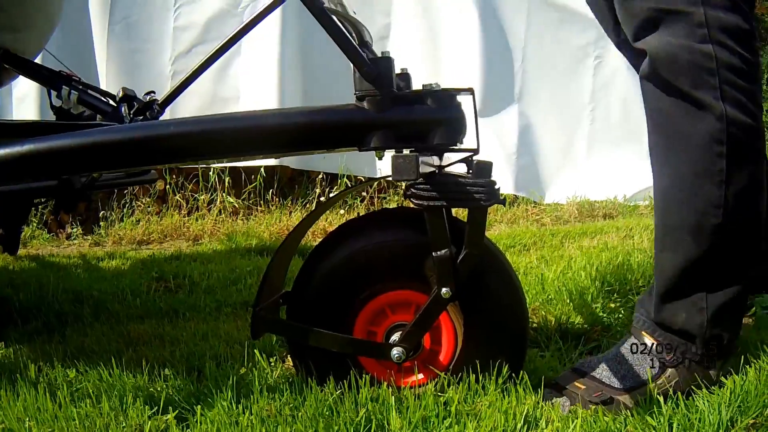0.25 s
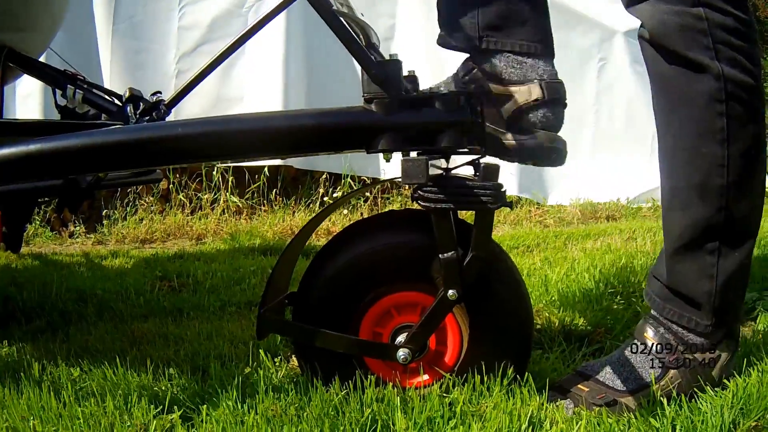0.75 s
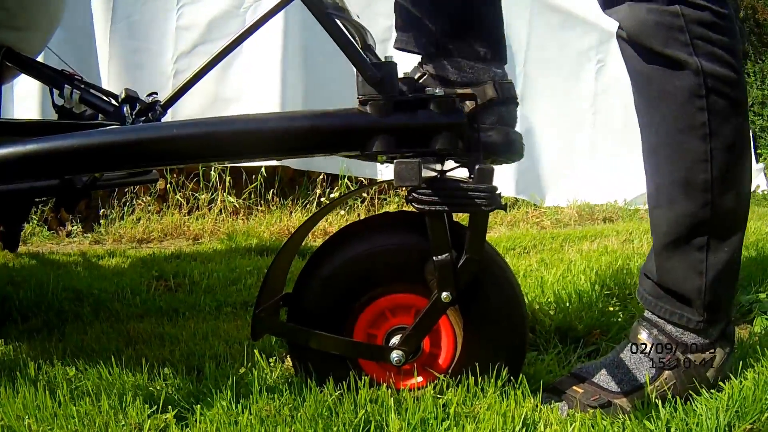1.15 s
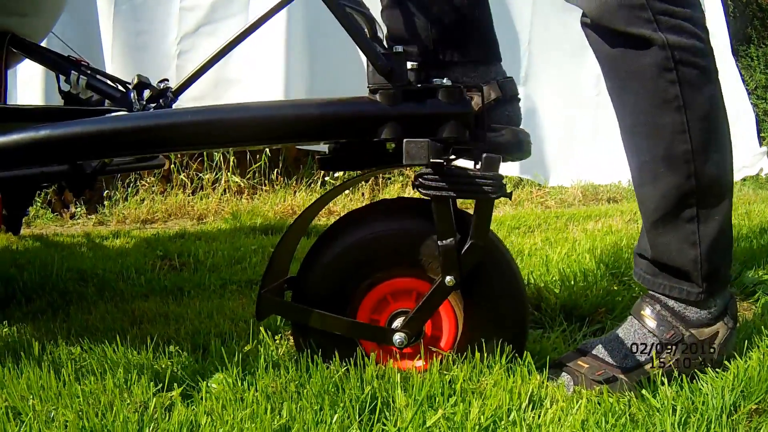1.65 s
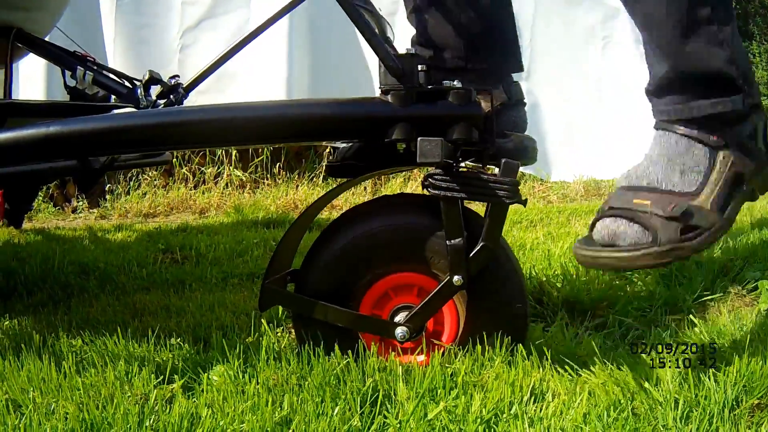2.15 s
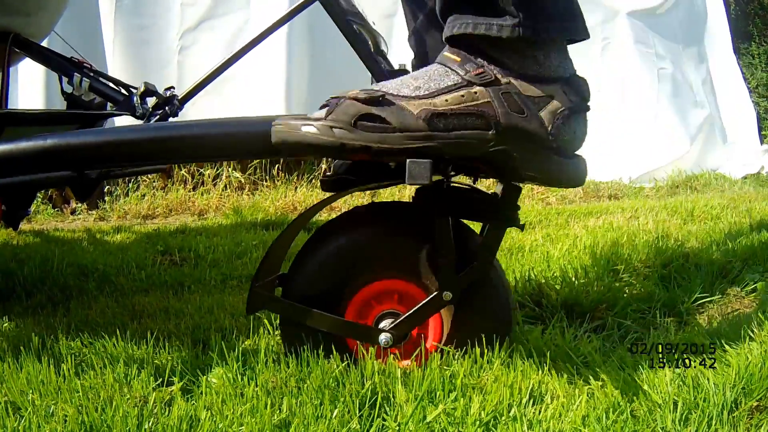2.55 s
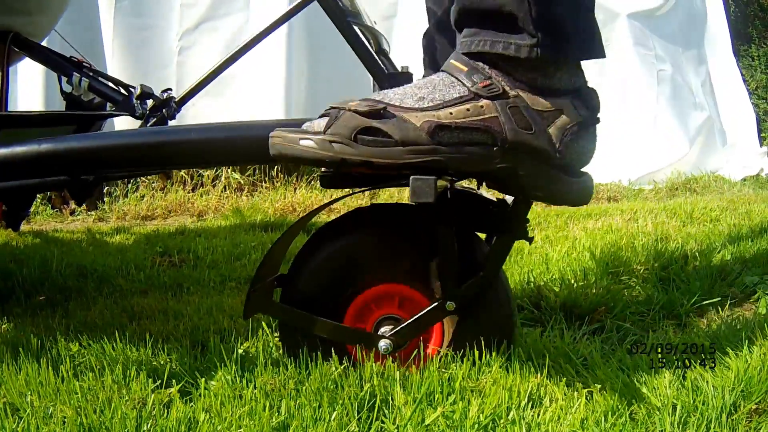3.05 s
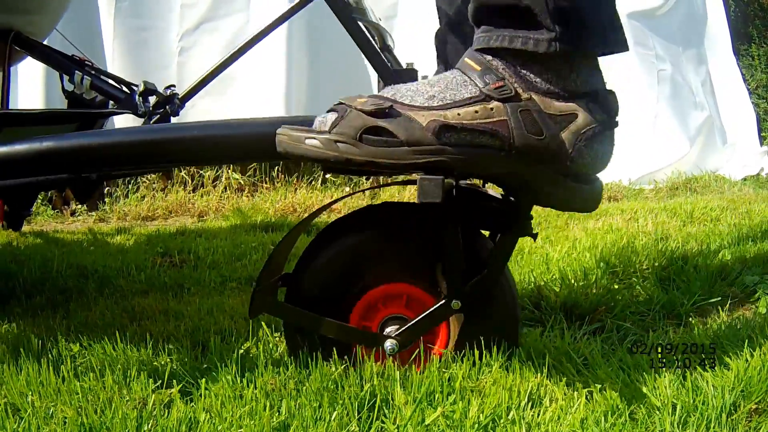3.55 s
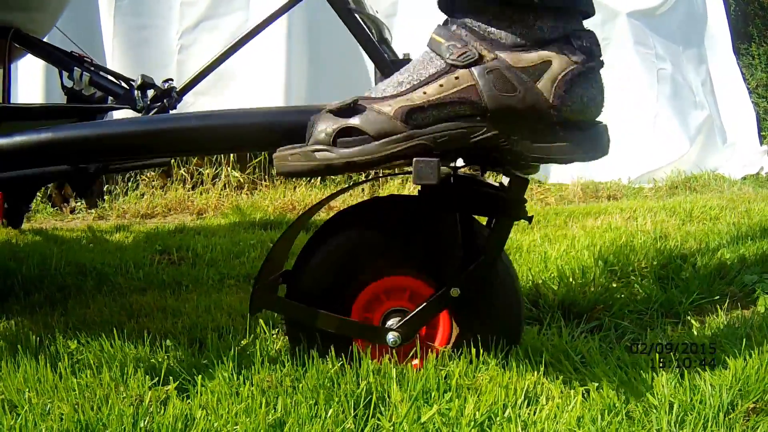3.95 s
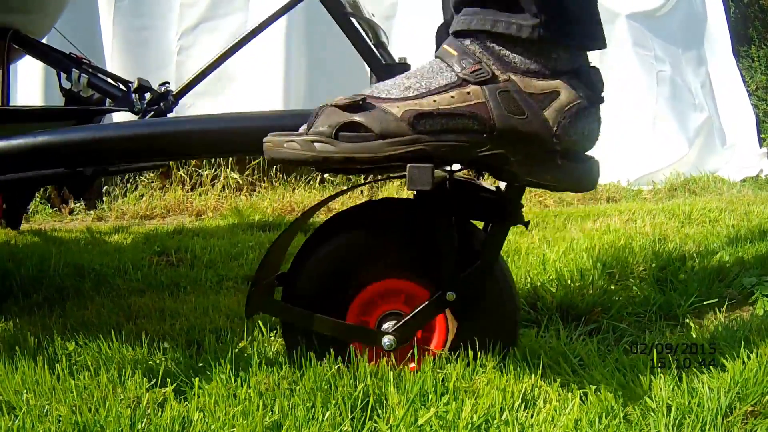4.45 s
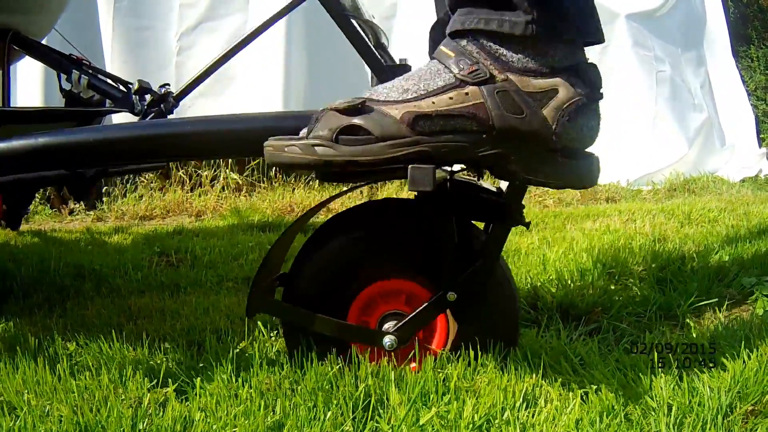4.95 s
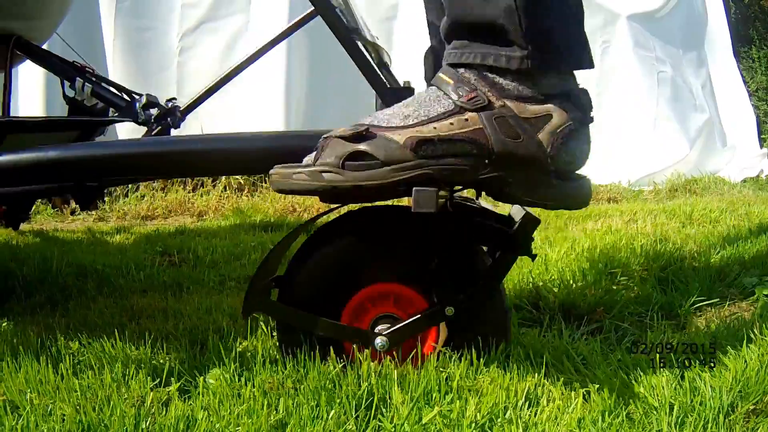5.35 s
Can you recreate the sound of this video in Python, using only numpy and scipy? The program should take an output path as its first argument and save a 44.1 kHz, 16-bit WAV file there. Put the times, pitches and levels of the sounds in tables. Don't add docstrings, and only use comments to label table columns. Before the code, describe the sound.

A foot-pumped sprung wheel fork gives sharp metallic clicks and short squeaks over a quiet low outdoor rumble with faint aircraft drone.

```python
import sys
import numpy as np
from scipy import signal
from scipy.fft import rfft, irfft, next_fast_len
from scipy.io import wavfile
from scipy.ndimage import uniform_filter1d, map_coordinates

SR = 44100
rng = np.random.default_rng(int(sys.argv[2]) if len(sys.argv) > 2 else 0)


def transcribe(u):
    v = np.clip(np.atleast_2d(u).T, -1, 1)
    q = np.round(v * 32767).astype(np.int16)
    wavfile.write(sys.argv[1], SR, q)


def natural_amplitude(level_db):
    exponent = np.asarray(level_db, float) / 20
    return 10 ** exponent


N = 246078


def unit(x):
    return x / np.sqrt(np.mean(x ** 2) + 1e-20)


def along(points, hz):
    f, v = np.transpose(points)
    return np.interp(np.log(hz + 1), np.log(f + 1), v)


def curves(rows):
    s, *cols = np.transpose(rows)
    return [np.interp(np.arange(N) / SR, s, c) for c in cols]


def bell(t, middle, half):
    return np.exp(-((t - middle) / half) ** 2)


def bumps(rows, base_db):
    t = np.arange(N) / SR
    return natural_amplitude(base_db) + sum(natural_amplitude(db) * bell(t, s, half) for s, db, half in rows)


def wobble(rate):
    return map_coordinates(rng.standard_normal(int(N * rate / SR) + 4), [np.arange(N) * rate / SR])


def filtered(x, response):
    m = next_fast_len(x.shape[-1] + 8192)
    return irfft(rfft(x, m) * response(np.fft.rfftfreq(m, 1 / SR)), m)[..., :x.shape[-1]]


def causal(spectrum):
    cep = irfft(np.log(natural_amplitude(along(spectrum, np.fft.rfftfreq(2048, 1 / SR))) + 1e-4))
    cep = cep * np.r_[1, np.full(1023, 2), 1, np.zeros(1023)]
    h = irfft(np.exp(rfft(cep)))[:1024]
    return h / np.linalg.norm(h)


def noise(spectrum, patchy_db):
    z = signal.stft(rng.standard_normal(N), nperseg=512)[2]
    field = uniform_filter1d(uniform_filter1d(rng.standard_normal(z.shape), 8, 0), 6, 1)
    x = signal.istft(z * natural_amplitude(patchy_db * unit(field)), nperseg=512)[1][:N]
    return unit(filtered(x, lambda hz: natural_amplitude(along(spectrum, hz))))


def dying_tones(rows):
    out, t = np.zeros(N + SR), np.arange(SR // 5) / SR
    for s, db, hz, t60 in rows:
        out[round(s * SR):][:len(t)] += natural_amplitude(db - 60 * t / t60) * np.sin(2 * np.pi * hz * t)
    return out[:N]


# (frequency [Hz], level [dB])
HISS_COLOUR = [(120, -73), (200, -2), (308, -9.5), (475, -7.5), (579, -13), (1090, -11.5), (13500, -19.5),
               (14800, -19.5)]


def hiss():
    return natural_amplitude(-67) * np.array([noise(HISS_COLOUR, patchy_db=.5), noise(HISS_COLOUR, patchy_db=1.5)])


# (time [s], level [dB])
TRAFFIC_LEVEL = [(0, -71), (.15, -62.5), (.76, -62.5), (1.15, -65.5), (1.35, -62.5), (2.1, -58), (2.5, -59),
                 (2.9, -63.5), (3.4, -62.5), (4.5, -59), (4.8, -61.5), (4.95, -57.5), (5.1, -62.5),
                 (5.5, -60.5)]
# (frequency [Hz], level [dB])
TRAFFIC_COLOUR = [(24, -24), (40, 0.5), (97, 1.5), (113, 0), (193, -4), (248, -9), (284, -16), (600, -28.5),
                  (780, -30), (1320, -120)]


def traffic():
    return natural_amplitude(curves(TRAFFIC_LEVEL)[0]) * noise(TRAFFIC_COLOUR, patchy_db=1.5)


# (frequency [Hz], level [dB])
MOTOR_TONES = [(124.8, -65), (191, -74), (146.7, -72)]


def motors():
    t = np.arange(N) / SR
    return sum(natural_amplitude(db + 3.5 * wobble(3.85)) * np.sin(2 * np.pi * hz * t + wobble(2.903))
               for hz, db in MOTOR_TONES)


BLADE_HZ, SPEED_MS, NEAREST_M, NEAREST_S = 76.25, 106.7, 293, 2.89
BLADE_FLOOR = [-68, -73.5, -87]
# (middle [s], level [dB], half length [s])
BLADE_SWELLS = [
    [(.55, -71, .3), (1.63, -55.5, 0.34), (2.75, -66.5, 0.46), (4, -58.5, 0.49), (4.75, -68, 0.35)],
    [(1.05, -81, .3), (2.15, -66.5, 0.49), (4.3, -63.5, 0.48), (5.4, -68.5, 0.41)],
    [(2.55, -63, 0.13), (3.6, -67.5, 0.64), (4.6, -69, 0.64), (5.45, -61.5, 0.24)],
]


def aircraft():
    past_m = SPEED_MS * (np.arange(N) / SR - NEAREST_S)
    receding_ms = SPEED_MS * past_m / np.hypot(past_m, NEAREST_M)
    hz = BLADE_HZ / (1 + receding_ms / 343)
    turn = 2 * np.pi * np.cumsum(hz) / SR
    out = np.zeros(N)
    for k, db in enumerate(BLADE_FLOOR):
        level = bumps(BLADE_SWELLS[k], db) * natural_amplitude(0.5 + 1.05 * wobble(3.9))
        out += level * np.sin((k + 1) * turn + .5 * wobble(4.07))
    return out


# (middle [s], level [dB], half length [s])
GUST_SWELLS = [(0, -63, 0.051), (.6, -68, 0.48), (1.23, -66, 0.037), (1.34, -65, 0.038), (1.6, -66, 0.13),
               (2.16, -66, 0.077), (2.7, -70, 0.21), (3.1, -64, 0.21), (3.46, -64, 0.052),
               (3.63, -72, 0.081), (4.28, -60, 0.083), (4.53, -46.5, 0.07), (4.68, -54, 0.063),
               (4.85, -46.5, 0.069), (5.1, -65, 0.053), (5.3, -56.5, 0.11)]
# (frequency [Hz], level [dB])
GUST_COLOUR = [(8.8, -13), (15, 2.5), (19, -4), (22, -8), (120, -15.5), (160, -54), (260, -120)]


def wind():
    shared = noise(GUST_COLOUR, patchy_db=2.5)
    own = np.array([noise(GUST_COLOUR, patchy_db=3), noise(GUST_COLOUR, patchy_db=2.5)])
    lumps = natural_amplitude(2.5 * wobble(12))
    return bumps(GUST_SWELLS, base_db=-70) * natural_amplitude([[-3], [2]]) * unit(lumps * (shared + 0.48 * own))


# (time [s], level [dB])
GRASS_LEVEL = [(0, -72), (.4, -68), (2.2, -67.5), (3, -69.5), (3.7, -67.5), (4.5, -72), (5.58, -70)]
# (frequency [Hz], level [dB])
GRASS_COLOUR = [(150, -34), (250, -2.5), (471, -6.5), (652, -5), (1090, -2.5), (1760, -3.5), (2570, -4.5),
                (3100, -6.5), (5460, -6.5), (7300, -18.5), (13500, -41), (15000, -34)]


def grass():
    return natural_amplitude(curves(GRASS_LEVEL)[0] + 0.5) * noise(GRASS_COLOUR, patchy_db=1.0)


# (time [s], level [dB])
CREEP_LEVEL = [(0, -61.5), (.28, -67.5), (.59, -62), (.96, -67.5), (1.24, -70), (1.48, -62.5),
               (1.75, -71.5), (2, -69), (2.24, -64.5), (3.09, -72), (3.55, -65), (4.51, -67), (5.58, -68.5)]
# (frequency [Hz], level [dB])
CREEP_COLOUR = [(2500, -18), (3800, -11), (4600, -7.5), (5300, -2.5), (6300, -6), (7500, -17.5),
                (10000, -24)]


def creep():
    (level_db,) = curves(CREEP_LEVEL)
    return natural_amplitude(level_db - 3.5 + 2.5 * wobble(24.8)) * noise(CREEP_COLOUR, patchy_db=-1.0)


# (middle [s], level [dB], half length [s], dull part [dB])
BRUSHES = [(0.006, -70, 0.03, 0), (0.593, -68.5, 0.22, -23), (2.173, -60.5, 0.046, -3),
           (2.34, -62.5, 0.062, -18), (2.765, -66.5, 0.091, -13), (2.94, -67, 0.027, 1),
           (3.255, -61.5, 0.042, -19), (3.56, -64.5, 0.029, 1.5), (3.764, -49.5, 0.015, -33),
           (4.307, -64, 0.034, -17), (4.59, -69, 0.02, -4), (4.796, -60.5, 0.042, -13),
           (5.088, -69, 0.03, -14), (5.29, -60.5, 0.036, -24), (5.351, -68, 0.026, -2)]
# (frequency [Hz], level [dB])
BRIGHT_COLOUR = [(1470, -40), (2500, -12), (4050, -3), (4480, -5), (5250, 4), (7980, -11.5), (9620, -16),
                 (14000, -28)]
# (frequency [Hz], level [dB])
DULL_COLOUR = [(600, -40), (1000, -7), (2000, -4), (4000, -6), (5500, -17), (8000, -39), (12000, -120)]


def brushing():
    t = np.arange(0, N / SR + .002, .002)
    swells = sum(natural_amplitude([[db], [db + dull_db]]) * bell(t, s, half) for s, db, half, dull_db in BRUSHES)
    bright, dull = curves(np.vstack([t, swells]).T)
    grit = np.exp(0.22 * wobble(400)) * natural_amplitude(1.5 * wobble(55))
    return grit * (bright * noise(BRIGHT_COLOUR, patchy_db=0.5) + dull * noise(DULL_COLOUR, patchy_db=3))


# (time [s], level [dB], frequency [Hz], negative starts inward, t60 [s])
THUMPS = [
    (.6802, -39.5, -300, .04),
    (.6938, -43, -178, .07),
    (1.506, -56, 350, .06),
    (2.543, -54, 400, .04),
    (4.253, -58, 450, .03),
    (4.931, -57, 420, .025),
    (4.937, -56, 260, .04),
    (4.8395, -43, 70, .07),
    (4.8785, -44, -110, .04),
]


def thuds():
    return dying_tones(THUMPS)


# (time [s], level [dB], frequency [Hz], t60 [s])
FORK_PINGS = [(1.4845, -48, 7000, .02), (1.489, -58, 2300, .05), (1.507, -29, 7000, .025),
              (1.507, -26, 5500, .016), (1.512, -40, 5850, .05), (1.5205, -43, 5800, .03),
              (.6825, -36, 4877, .03), (.691, -47, 5800, .08), (.6815, -41, 6476, .02),
              (2.5533, -52, 4550, .02), (2.5605, -46, 5500, .012), (2.648, -56, 6300, .025),
              (2.651, -57, 4500, .06), (2.652, -59, 2250, .03), (3.1592, -50, 1200, .025),
              (3.161, -49, 4950, .03), (3.166, -53, 5950, .16), (3.166, -56, 5860, .07),
              (3.5075, -46, 4900, .025), (3.508, -51, 7000, .02), (3.509, -49, 6000, .04),
              (3.5475, -52, 5430, .03), (3.766, -38, 5000, .04), (3.763, -51, 1100, .03),
              (3.786, -56, 3400, .05), (4.9295, -54, 2200, .015), (5.4238, -34, 5900, .03),
              (5.424, -42, 3693, .025), (5.43, -53, 3500, .12)]


def pings():
    return dying_tones(FORK_PINGS)


# (time [s], slip rate [Hz], level [dB])
LONG_SQUEAKS = [
    [(2.092, 855, -67), (2.103, 945, -57), (2.113, 1160, -55.5), (2.121, 1220, -55), (2.129, 1295, -52),
     (2.139, 1300, -61)],
    [(3.546, 1600, -62), (3.549, 1300, -58), (3.554, 1060, -58), (3.564, 1300, -63)],
    [(4.0405, 1225, -49), (4.049, 1250, -49), (4.0555, 1140, -50), (4.058, 1160, -43), (4.063, 1200, -41.5),
     (4.07, 1129, -43), (4.079, 830, -47)],
]
# (roughness [0-1], lowest tone [dB], second tone [dB])
SQUEAK_VOICES = [(.03, 2, 2), (.03, 11, -8), (.06, -5, -8)]
# (time [s], length [s], first rate [Hz], last rate [Hz], level [dB])
COIL_CHIRPS = [
    (2.553, .011, 4400, 2750, -59),
    (2.553, .012, 4500, 4900, -59),
    (2.645, .017, 1200, 1110, -77),
    (3.7145, .016, 2450, 3470, -55.5),
    (3.729, .009, 3950, 4300, -60),
    (3.737, .01, 4200, 3900, -65),
    (3.741, .012, 3000, 3400, -68),
    (4.471, .011, 1000, 1000, -68),
]
CHIRP_VOICE = (.05, 19, 1)
CHIRP_SWELL_DB, CHIRP_PEAK, CHIRP_BEND = 10, .7, .9
EASY_HZ, ROUGH_PER_OCT, LOW_DB_PER_OCT = 1200, .2, 45


def slips():
    runs = [(rows, voice, 1) for rows, voice in zip(LONG_SQUEAKS, SQUEAK_VOICES)]
    for s, length, first, last, db in COIL_CHIRPS:
        start = (s, first, db - CHIRP_SWELL_DB)
        peak = (s + length * CHIRP_PEAK, first + (last - first) * CHIRP_BEND, db)
        end = (s + length, last, db - CHIRP_SWELL_DB)
        runs.append(([start, peak, end], CHIRP_VOICE, 0))
    for rows, (rough, low_db, second_db), sticks in runs:
        s, *cols = np.transpose(rows)
        t = np.arange(s[0], s[-1], 1 / SR)
        hz, db = (np.interp(t, s, c) for c in cols)
        slow = sticks * np.clip(np.log2(EASY_HZ / hz), -.3, .2)
        roughness = np.abs(rough) + ROUGH_PER_OCT * np.maximum(slow, 0)
        yield s, t, hz, db, roughness, low_db + LOW_DB_PER_OCT * slow, second_db


# (frequency [Hz], level [dB])
SQUEAK_COLOUR = [(590, -36), (1000, -21), (1220, -10), (1470, 8), (2340, -7.5), (2820, -13), (3480, -5),
                 (4060, -1.5), (5660, 5.5), (7220, -8), (14000, -22)]


def squeaks():
    out = np.zeros(N)
    for s, t, hz, db, rough, low_db, second_db in slips():
        draw = rng.standard_normal((15, len(t)))
        jitter = unit(uniform_filter1d(draw[0], 30))
        turn = 2 * np.pi * np.cumsum(hz * (1 + 0.39 * (rough + 0.065) * jitter)) / SR
        k = np.arange(1, 13)[:, None]
        flicker = natural_amplitude(2 * unit(uniform_filter1d(draw[3:], 250)) + second_db * (k == 2))
        bright_db = 1.6 * (db - db.max()) * np.clip(np.log2(k * hz / 6500), 0, 1)
        colour = natural_amplitude(along(SQUEAK_COLOUR, k * hz) + bright_db)
        tones = flicker * colour * np.cos(k * turn + np.pi / 2 + .5 * draw[3:, :1])
        grit = signal.fftconvolve(draw[1] * (1 + np.cos(turn)) ** 2, causal(RATTLE_COLOUR))[:len(t)]
        share = np.clip(rough, 0, 1)
        size = natural_amplitude(1.5 * unit(uniform_filter1d(draw[2], 40)))
        low_turn = 2 * np.pi * np.cumsum(hz * (1 + 0.008 * jitter)) / SR
        voice = np.sqrt(1 - share) * size * unit(tones.sum(0)) + np.sqrt(share) * unit(grit)
        voice = voice + natural_amplitude(low_db - 9.0) * np.cos(low_turn)
        edge = np.clip(np.minimum(t - s[0], s[-1] - t) / 0.00032, 0, 1)
        out[round(s[0] * SR):][:len(t)] += natural_amplitude(db) * edge * voice
    t = np.arange(SR // 8) / SR
    after = rng.standard_normal(len(t)) * natural_amplitude(-60 * t / 0.091)
    return out + natural_amplitude(-9.5) * signal.fftconvolve(out, after / np.linalg.norm(after))[:N]


# (time [s], peak level [dB], low knock [dB], loudest ring [Hz], its level [dB])
PIVOT_SNAPS = [(.678, -37, -12, 5860, -14), (.6804, -28, -41, 5380, -15), (.6849, -37, -14, 4800, -16),
               (1.4828, -38.5, -12, 5230, -21), (1.4991, -35, -35, 4570, -8), (1.506, -23, -47, 5360, -14),
               (1.5071, -26, -27, 5200, -11), (1.9076, -43.5, -34, 5000, -8),
               (2.0442, -34.5, -24, 5800, -11), (2.0744, -23, -19, 5220, -6),
               (3.1592, -36.5, -6.5, 5720, -9), (3.5047, -32, -22, 5350, -19),
               (3.695, -33.5, -16, 5920, -6), (3.7598, -24.5, -23, 5060, -19), (3.776, -33, -11, 5960, -16),
               (4.0512, -46, -23, 4900, -17), (5.4231, -22.5, -23, 5770, -30)]
# (time [s], peak level [dB], low knock [dB])
PIVOT_TICKS = [(0.698, -45, -4), (1.473, -50, -16), (1.52, -43, -2), (1.5838, -49.5, -7), (2.531, -47, -13),
               (2.5417, -44, -15), (2.5563, -47, -29), (2.6445, -48, -24), (2.9264, -47, -17),
               (2.9914, -47, -35), (3.039, -51, -25), (3.057, -52, -24), (3.448, -48.5, -22),
               (3.549, -51, -22), (4.2516, -50, -0.5), (4.331, -53.5, 3.5), (4.4836, -42.5, -10),
               (4.674, -56, -26), (4.817, -50, 2.5), (4.931, -49.5, 4), (5.0038, -50.5, -0.5),
               (5.2799, -43.5, -29), (5.319, -50, 2), (5.4994, -51, 0.5)]
# (frequency [Hz], level [dB], t60 [s])
STEEL_MODES = [(1040, -29, 0.076), (1760, -31, 0.027), (2163, -11, 0.068), (2530, -7, 0.16),
               (2780, -7, 0.087), (3550, -23, 0.082), (3960, -15, .05), (4340, -5, 0.069), (4980, -2, 0.06),
               (5250, 3.5, 0.064), (5570, -5.5, 0.036), (5770, 2.5, 0.059), (6540, 0, 0.042),
               (7010, 2.5, 0.031), (8160, -1, 0.034)]
# (frequency [Hz], level [dB])
RATTLE_COLOUR = [(350, -56), (600, -65), (1440, -15.5), (1730, -5), (1900, -20.5), (2090, -11.5),
                 (4330, -4), (5780, -2), (7720, -12), (13200, -29), (16000, -45)]
TICK_RING_HZ, TICK_RING_DB, TICK_SPREAD = 5340, -13.5, 0.043
SNAP_RISE_S, TICK_RISE_S = .0003, .0013
RATTLE_T60, KNOCK_T60 = 0.055, 0.087


def clicks():
    rattle, ring, knock = np.zeros((3, N + SR))
    t = np.arange(SR // 9) / SR
    for s, db, knock_db, *peak in sorted(PIVOT_SNAPS + PIVOT_TICKS):
        at = slice(round(s * SR), round(s * SR) + len(t))
        draw = rng.standard_normal((3, len(t)))
        peak_hz, peak_db = peak or (TICK_RING_HZ * (1 + TICK_SPREAD * draw[1, -1]), TICK_RING_DB)
        spiky = draw[0] * np.exp(.3 * draw[1])
        spiky = spiky / np.sqrt(np.abs(uniform_filter1d(spiky ** 2, size=90)))
        after_rattle = natural_amplitude(-19.5 - 60 * t / 0.25)
        first_crack = 0.4 * natural_amplitude(-60 * t / 0.016)
        fade = natural_amplitude(-60 * t / RATTLE_T60) + after_rattle + first_crack
        rise = 1 - np.exp(-t / (SNAP_RISE_S if peak else TICK_RISE_S))
        rattle[at] += natural_amplitude(db - 13.0) * fade * rise * spiky
        knock[at] += natural_amplitude(db + knock_db - 8.5) * natural_amplitude(-60 * t / KNOCK_T60) * draw[2]
        ring_fade = natural_amplitude(db + peak_db - 60 * t / 0.035) * (1 - np.exp(-t / 0.0011))
        ring[at] += ring_fade * np.sin(2 * np.pi * peak_hz * t)
        for k, (hz, level, decay) in enumerate(STEEL_MODES):
            pitch = hz * (1 + 0.005 * draw[2, k])
            mode_db = db - 22 + level + 3 * draw[1, k]
            ring[at] += natural_amplitude(mode_db - 60 * t / min(decay, .065)) * np.sin(2 * np.pi * pitch * t)

    def tube(f):
        return 4 * (1j * f * 900 / (1000 ** 2 - f * f + 1j * f * 900)) ** 2

    impacts = signal.fftconvolve(rattle, causal(RATTLE_COLOUR))[:N + SR]
    return (impacts + ring + filtered(knock, tube))[:N]


# (frequency [Hz], level [dB])
LEFT_OVER_RIGHT = [(60, -4.5), (130, -4), (250, 2), (600, 7), (1500, 6), (5000, 6), (9000, 5.5),
                   (15000, -1)]
# (frequency [Hz], phase [rad])
LEFT_LEAD = [(60, 0.32), (340, 1), (900, 0.83), (3000, 0.057)]


def scene():
    far = traffic() + motors() + aircraft() + grass()
    fork = creep() + brushing() + thuds() + pings() + squeaks() + clicks()
    half = np.array([[.5], [-.5]])
    pair = filtered(far + fork, lambda hz: natural_amplitude(half * along(LEFT_OVER_RIGHT, hz))
                    * np.exp(1j * half * along(LEFT_LEAD, hz)))
    return pair + wind() + hiss()


# (time [s], edge [Hz])
TREBLE_EDGE = [(0, 13600), (.68, 14250), (3.52, 13500), (4.04, 15000), (5.33, 14200)]


def thin_treble(x, quiet_db):
    hz, t, z = signal.stft(x, SR, nperseg=512)
    level = uniform_filter1d(np.abs(z).mean(0), 9, 0)
    since, top_hz = np.transpose(TREBLE_EDGE)
    edge = top_hz[np.searchsorted(since, t, "right") - 1] + 80 * rng.standard_normal(len(t))
    tiles = np.kron(rng.random((len(hz) // 3 + 1, len(t) // 4 + 1)), np.ones((3, 4)))
    tiles = tiles[:len(hz), :len(t)]
    holes = .4 * np.clip((hz[:, None] - 11500) / 3000, 0, 1) ** 2
    keep = ((hz[:, None] < edge) & (tiles > holes)) | (level > natural_amplitude(quiet_db))
    return signal.istft(z * keep, SR, nperseg=512)[1][:, :N]


def band_limit(x):
    return signal.sosfilt(signal.butter(12, 16130, fs=SR, output="sos"), x)


# (frequency [Hz], level [dB])
MICROPHONE_TOP = [(12000, 0), (14500, 0), (15200, -0.5), (16000, -3), (17000, -30)]
CONVERTER_OFFSET = [
    [.0058],
    [.01449],
]


def record(dry):
    heard = filtered(dry, lambda hz: natural_amplitude(along(MICROPHONE_TOP, hz)))
    heard = thin_treble(heard, quiet_db=-93)
    return band_limit(heard + CONVERTER_OFFSET)


dry = scene()
out = record(dry)
transcribe(out)
```